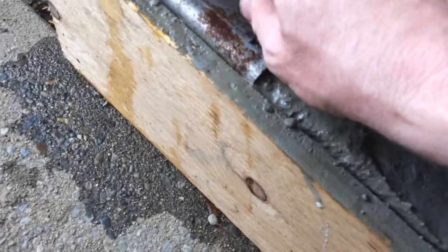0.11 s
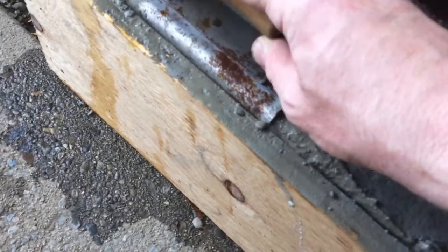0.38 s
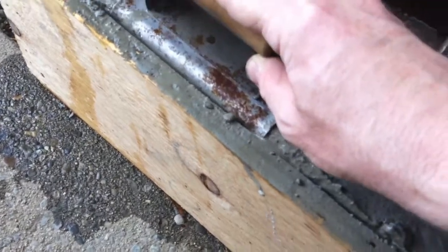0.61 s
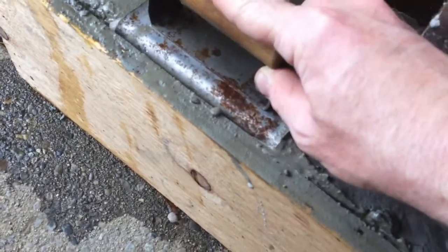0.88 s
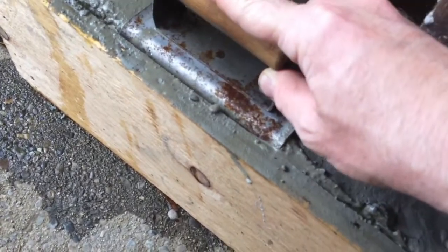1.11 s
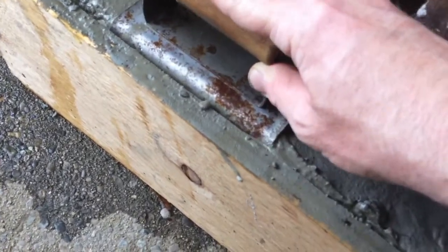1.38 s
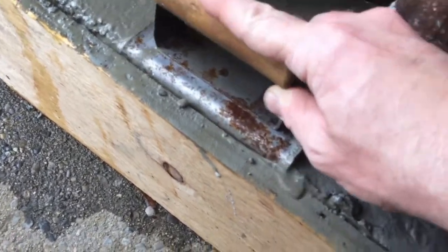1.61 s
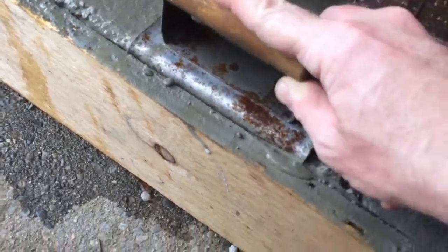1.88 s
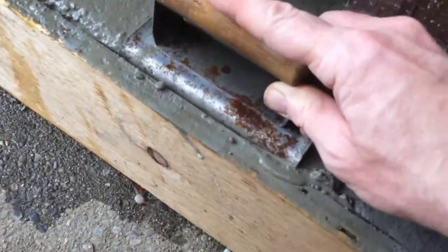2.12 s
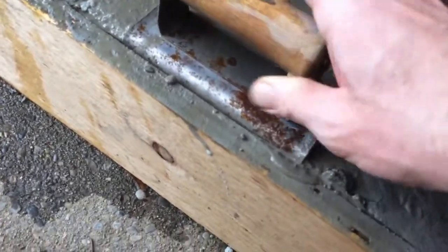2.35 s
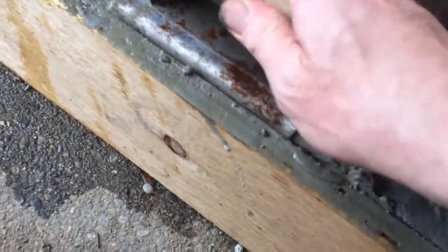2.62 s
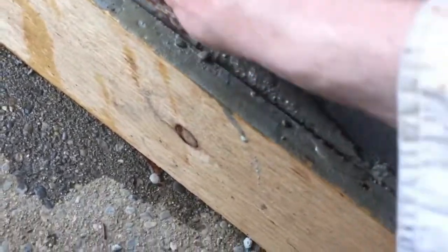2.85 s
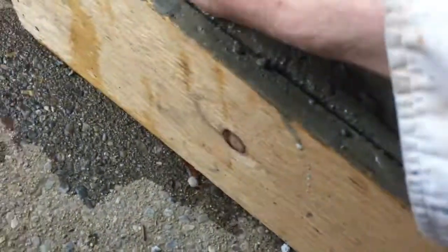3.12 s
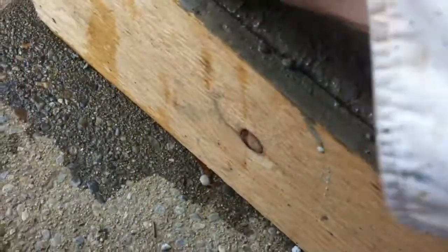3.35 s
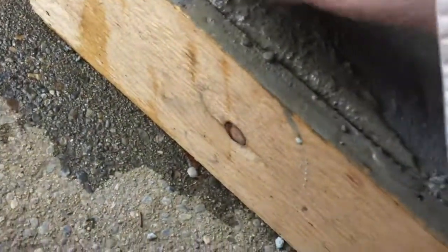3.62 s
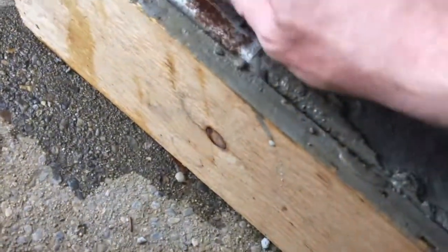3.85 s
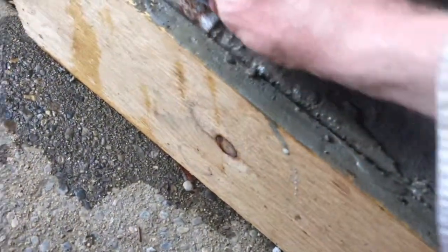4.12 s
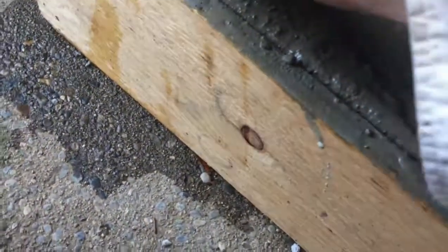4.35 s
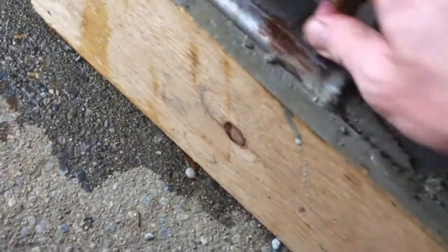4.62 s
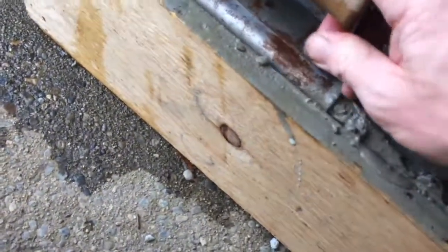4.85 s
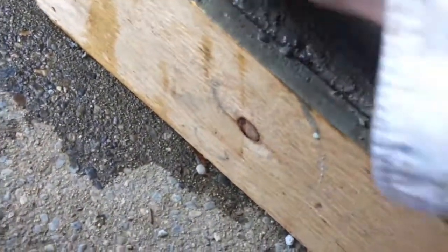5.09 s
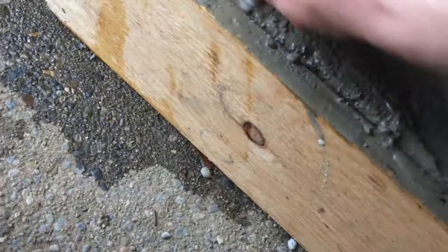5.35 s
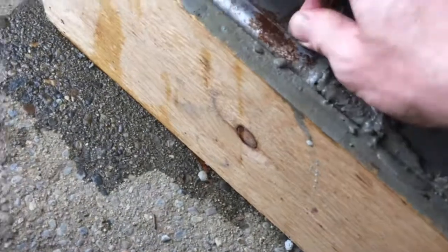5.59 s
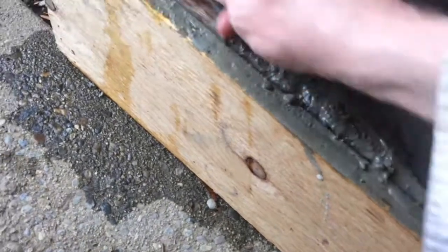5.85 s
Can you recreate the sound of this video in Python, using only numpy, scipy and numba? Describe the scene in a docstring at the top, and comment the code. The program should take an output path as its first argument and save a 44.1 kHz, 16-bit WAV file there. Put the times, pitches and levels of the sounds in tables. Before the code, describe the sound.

Close, sandy metallic scraping of a hand tool on wet concrete, crowded at first, sparser midway, then busy again with sharp stone ticks.

```python
"""Outdoors, a steel edging tool is worked back and forth along wet concrete beside a wooden form.
From the start far traffic rumbles as filtered noise, and pushes crowd together: sand grains slip in dense
clicks that drive the blade and form board as resonators, and stones catch with a snap and a short ring.
In the first second the blade sings most freely; from about two seconds it is mostly bedded and damped,
with a lull of small slips. After four seconds the pushes crowd again, with some of the hardest catches."""
import sys
import numpy as np
from scipy import signal
from scipy.fft import rfft, irfft
from scipy.io import wavfile
from numba import njit

SR = 44100
rng = np.random.default_rng(int(sys.argv[2]) if len(sys.argv) > 2 else 0)


def to_wav(sig):
    """Store sig (one row per channel, or 1-D mono) as 16-bit WAV at the path in sys.argv[1].

    Samples outside -1..1 are clipped; the rate is SR.
    """
    pcm = np.clip(np.atleast_2d(sig), -1, 1) * 32767
    pcm = np.round(pcm).astype(np.int16)
    wavfile.write(sys.argv[1], SR, pcm.T)  # frames by channels


def volts(x):
    """Linear amplitude factor 10**(x/20) for a level x in dB, scalar or array-like."""
    e = np.asarray(x, float) / 20
    return 10 ** e


N = 263277


def rms_one(x):
    """Normalization: scale to unit rms, so that levels compare by power."""
    return x / np.sqrt(np.mean(x ** 2) + 1e-20)


def in_time(rows):
    """Linear interpolation: the columns of a time table, one value per sample."""
    s, *columns = np.transpose(rows)
    return [np.interp(np.arange(N) / SR, s, c) for c in columns]


def coloured(x, spectrum):
    """Minimum-phase filtering: causal, so nothing sounds early; follows a (frequency, level) table."""
    hz, db = np.transpose(spectrum)
    grid = np.maximum(np.arange(2049) * SR / 4096, 1)
    log_gain = np.log(volts(np.interp(np.log(grid), np.log(hz), db)))
    cepstrum = irfft(log_gain)
    # folding the cepstrum onto positive time gives minimum phase
    cepstrum[1:2048] *= 2
    cepstrum[2049:] = 0
    impulse_response = irfft(np.exp(rfft(cepstrum)))
    return rms_one(signal.fftconvolve(x, impulse_response)[:N])


def drift(rate_hz):
    """Low-pass random process: slow chance with unit rms, made at SR / 20 and interpolated."""
    r = np.exp(-40 * np.pi * rate_hz / SR)
    noise = rng.standard_normal(N // 20 + 4002)
    slow = signal.lfilter([1], [1, -2 * r, r * r], noise)[4000:]   # start-up dropped
    return np.interp(np.arange(N) / 20, np.arange(len(slow)), rms_one(slow))


@njit
def resonate(x, hz, width, sr):
    """Two-pole resonance with movable centre and width; its noise power hardly depends on the width."""
    y = np.zeros(len(x))
    for i in range(2, len(x)):
        r = np.exp(-np.pi * width[i] / sr)
        drive = np.sqrt(1 - r * r) * (x[i] - x[i - 2])
        y[i] = drive + 2 * r * np.cos(2 * np.pi * hz[i] / sr) * y[i - 1] - r * r * y[i - 2]
    return y


def modes(x, table, wander_db):
    """Modal superposition: parallel resonances, each driven harder or softer from moment to moment."""
    out, ones = 0, np.ones(N)
    for k, (hz, width_hz, db) in enumerate(table):
        drive = x * volts(db + wander_db * np.tanh(drift(rate_hz=8.1)))
        ringing = resonate(drive, hz * ones, max(width_hz, 5) * ones, SR)   # at least 5 Hz wide
        out = out + (-1) ** k * ringing
    return rms_one(out)


# relative spectrum of the road: (frequency [Hz], spectral density [dB])
ROAD_SPECTRUM = [(15, -66), (25, -5), (130, 0.5), (180, -1.5), (236, -8), (439, -18.5), (840, -24.5),
                 (936, -18), (1020, -25.5), (1440, -20.5), (2050, -28), (2280, -22), (3620, -39),
                 (7110, -68), (16000, -50)]
# engine notes in the rumble: (frequency [Hz], width, raised to 5 if less [Hz], drive level [dB])
ENGINE_NOTES = [(65, 4.8, -12), (138, 4.1, -5), (241.7, 5.7, -10.5)]
TRAFFIC_DB = -40.5   # of the road before its slow wander


def traffic():
    """Noise filtering and resonance: distant road rumble, blurred engine notes and a soft outdoor hiss."""
    road = coloured(rng.standard_normal(N), ROAD_SPECTRUM)
    drone = volts(-8.0) * modes(rng.standard_normal(N), ENGINE_NOTES, wander_db=3.0)
    drone = signal.sosfilt(signal.butter(2, [45, 300], "band", fs=SR, output="sos"), drone)
    return volts(TRAFFIC_DB + 2.0 * drift(rate_hz=3.7)) * (road + drone)


# pushes of the hand: (bite time [s], turn time [s], lift time [s],
#                      level at bite [dB], level at turn [dB], level at lift [dB])
HAND_PUSHES = [(0.0, 0.003, 0.14, -19, -25.5, -34.5), (.135, .216, .25, -33.5, -25.5, -30.5),
               (.262, 0.327, .35, -31, -28, -36), (0.366, 0.37, .4, -29, -27.5, -30),
               (0.407, 0.423, 0.47, -35, -28.5, -34.5), (0.467, .528, 0.59, -30, -26.5, -35),
               (0.614, 0.638, 0.7, -36, -31, -37), (0.798, 0.889, 0.953, -27.5, -27, -41.5),
               (1.03, 1.079, 1.093, -49.5, -34.5, -29), (1.43, 1.47, 1.57, -63, -44, -40),
               (1.507, 1.587, 1.629, -27, -20.5, -39), (1.732, 1.745, 1.754, -31, -33, -34),
               (1.769, 1.827, 1.856, -30.5, -25.5, -42.5), (1.942, 1.978, 2.014, -41, -34.5, -52),
               (2.17, 2.209, 2.256, -58, -39, -38.5), (2.601, 2.663, 2.67, -39, -29.5, -29.5),
               (2.688, 2.775, 2.928, -29.5, -24, -39), (2.92, 2.992, 3.09, -31, -32, -33.5),
               (3.204, 3.28, 3.338, -36, -26.5, -22.5), (3.49, 3.597, 3.684, -50.5, -35, -28),
               (3.646, 3.66, 3.738, -24, -32, -33.5), (3.754, 3.92, 3.935, -35, -30.5, -36),
               (4.034, 4.146, 4.21, -58.5, -34.5, -26.5), (4.23, 4.248, 4.27, -25.5, -25, -34),
               (4.268, 4.289, 4.32, -28.5, -21, -36.5), (4.437, 4.49, 4.512, -46.5, -36, -30),
               (4.52, 4.534, 4.53, -25, -26.5, -24), (4.54, 4.652, 4.773, -30.5, -19.5, -32),
               (4.819, 4.854, 5.06, -58, -41.5, -25), (4.912, 5.005, 5.1, -27.5, -24, -26.5),
               (5.101, 5.13, 5.185, -30, -30, -26), (5.23, 5.41, 5.44, -48, -29, -22.5),
               (5.439, 5.519, 5.593, -21.5, -21.5, -39), (5.616, 5.68, 5.715, -37.5, -34, -40),
               (5.728, 5.813, 6.12, -34, -30.5, -31.5)]
# small slips of the resting tool: (time [s], held time [s], level [dB])
SMALL_SLIPS = [(.708, 0.046, -49.5), (0.774, 0.006, -30.5), (1.222, .03, -58), (1.346, .002, -52),
               (1.405, 0.039, -60.5), (1.66, 0.014, -52), (1.885, .004, -56), (1.9, 0.016, -43),
               (2.064, 0.0083, -43), (2.088, 0.022, -40.5), (2.35, .003, -61), (2.39, .012, -54.5),
               (2.44, .002, -58), (2.488, 0.0087, -53.5), (2.545, .04, -50.5), (3.15, 0.036, -44),
               (3.375, 0.021, -51), (3.402, 0.013, -42), (3.42, .035, -50), (3.98, .003, -54),
               (4.322, 0.013, -37.5), (4.36, 0.073, -53), (4.41, 0.023, -40.5)]
BITE_DB_PER_S, LIFT_DB_PER_S = 1800, 1194   # how fast a push sets in and lets go
SLIP_DB_PER_S, SETTLE_DB_PER_S, REST_DB = 2000, 1500, -65


def pressure_db():
    """Masking by the maximum: the strongest push or slip sets the scrape level, over a faint rest."""
    t, level = np.arange(N) / SR, np.full(N, float(REST_DB))
    for bite, turn, lift, *dbs in HAND_PUSHES:
        edges = BITE_DB_PER_S * np.maximum(bite - t, 0) + LIFT_DB_PER_S * np.maximum(t - lift, 0)
        level = np.maximum(level, np.interp(t, [bite, turn, lift], dbs) - edges)
    for s, held, db in SMALL_SLIPS:
        edges = SLIP_DB_PER_S * np.maximum(s - t, 0) + SETTLE_DB_PER_S * np.maximum(t - s - held, 0)
        level = np.maximum(level, db - edges)
    return level


GRAINS_PER_S = 5000


def slips(spread_db, judder_db, count):
    """Stick-slip excitation: uneven grain clicks over wet hiss, bunched by judder; random signs per body."""
    sizes = volts(spread_db * np.minimum(rng.exponential(1, N), 5))
    clicks = sizes * (rng.random(N) < GRAINS_PER_S / SR)
    judder = volts(judder_db * (drift(rate_hz=54) + 0.81 * drift(rate_hz=180)))
    hiss_power = volts(-4.5)
    rough = rms_one(np.sqrt(rms_one(clicks) ** 2 + hiss_power) * judder)
    # each body feels the slips in its own direction
    return rough * rng.choice([-1, 1], (count, N))


def patchy(carriers, patch_db):
    """Band-wise modulation: about third-octave bands swell and fade as sand of other sizes passes."""
    edges = np.geomspace(1300, 12000, 11)
    out = 0
    for k, edge in enumerate(zip(edges, edges[1:])):
        band = signal.sosfilt(signal.butter(2, edge, "band", fs=SR, output="sos"), carriers[k % 2])
        out = out + band * volts(patch_db * np.tanh(drift(rate_hz=4.7)))
    return out


def pebbles(per_s, cycles):
    """Impulse response: coarser grains roll by at random, each ringing briefly at one of 16 pitches."""
    sizes = volts(4.0 * np.minimum(rng.exponential(1, N), 3)) * (rng.random(N) < per_s / SR)
    pitches, dealt, ones = np.geomspace(1000, 10000, 16), rng.integers(0, 16, N), np.ones(N)
    out = 0
    for k, hz in enumerate(pitches):
        out = out + resonate(sizes * (dealt == k), hz * ones, hz / cycles * ones, SR)
    return rms_one(out)


# fixed modes of the steel: (frequency [Hz], width [Hz], drive level [dB])
STEEL_MODES = [(5400, 350, -4), (7200, 250, -4), (8300, 200, -8), (11000, 400, -11)]
# relative spectrum of the sand: (frequency [Hz], spectral density [dB])
SAND_SPECTRUM = [(1300, -38), (2000, -20.5), (2500, -2), (3500, -1), (5500, 3), (7000, 3.5), (8500, 1),
                 (11000, -23)]


def sand_and_steel(sand_force, steel_force, free):
    """Energy sharing: the freer the blade, the more its fixed modes stand out of the sand."""
    steel = modes(steel_force, STEEL_MODES, wander_db=9.0)
    sand = coloured(patchy(sand_force, patch_db=4.5), SAND_SPECTRUM)
    return np.sqrt(1 - 0.92 * free ** 2) * sand + volts(-9.5) * free * steel


# two upper blade modes shift with grip and angle: (time [s], second mode frequency [Hz],
#   second mode level [dB], third mode frequency [Hz], third mode level [dB])
UPPER_MODES = [(0, 3200, -13, 5270, -11), (.2, 2830, -8.5, 4640, -8), (.63, 3320, -6.5, 4350, -7),
               (.93, 3340, -4.5, 4430, -8.5), (1.55, 3180, -9.5, 4650, -9), (1.78, 2860, -5.5, 4370, -4.5),
               (2.2, 3130, -7.5, 4700, -8), (2.7, 3100, -13, 4760, -8.5), (3.05, 3240, -6.5, 5000, -4.5),
               (3.4, 2850, -12, 4540, -11.5), (3.8, 3000, -18, 5300, -11), (4.2, 2950, -11, 4500, -2.5),
               (4.5, 3370, -12.5, 4900, -16), (4.75, 3460, -6.5, 4700, -12.5), (5.08, 3270, -8, 4410, -3),
               (5.25, 3070, -15, 5260, -18), (5.52, 3040, -4, 5560, -6), (5.97, 3300, -8.5, 4900, -4)]


def upper_modes(second_force, third_force, width_hz):
    """Time-varying resonance: two upper blade modes move in pitch and level."""
    second_hz, second_db, third_hz, third_db = in_time(UPPER_MODES)
    second = rms_one(resonate(second_force, second_hz, .8 * width_hz, SR))
    third = rms_one(resonate(third_force, third_hz, 1.1 * width_hz, SR))
    return volts(second_db) * second + volts(third_db) * third


BEDDED_RING_DB, FREE_RING_DB = -16.5, 2   # before the push level and chance grip
GRIP_DB = 2.1   # chance unevenness of the grip


def lowest_mode(force, pitch_hz, width_hz, free):
    """Cascaded resonance: two passes give the lowest blade mode steep skirts; freedom raises its level."""
    song = resonate(force, pitch_hz, width_hz, SR)
    song = rms_one(resonate(song, pitch_hz, 1.1 * width_hz, SR))
    return volts(between(BEDDED_RING_DB, FREE_RING_DB, free) + GRIP_DB * drift(rate_hz=6.3)) * song


# relative spectrum of the bedded blade's damped scrape: (frequency [Hz], spectral density [dB])
SLURRY_SPECTRUM = [(500, -37), (800, 1.5), (1100, -1.5), (1700, 0.5), (2300, -5.5), (3500, -30.5)]
SLURRY_DB = -7   # fully bedded, before the push level and chance grip


def slurry(force, free):
    """Damping: a bedded blade scrapes broadly and fades from hearing as it comes free."""
    level = volts(SLURRY_DB + GRIP_DB * drift(rate_hz=3.0))
    return level * np.sqrt(1 - free) * coloured(force, SLURRY_SPECTRUM)


# modes of the form board: (frequency [Hz], width [Hz], drive level [dB])
BOARD_MODES = [(213, 123, -8), (383, 99, -0.5), (443.6, 116, 0.5), (580, 165, -1.5)]


def form_board(force, board_db):
    """Sympathetic vibration: the wooden form answers the slips lower down, through a low-pass."""
    board = volts(board_db) * modes(force, BOARD_MODES, wander_db=2.0)
    return signal.sosfilt(signal.butter(2, 900, fs=SR, output="sos"), board)


# relative spectrum of the finest sand: (frequency [Hz], spectral density [dB])
FINE_SAND_SPECTRUM = [(5000, -60), (7500, -31), (9000, 0.5), (11000, -1), (13000, -5), (14500, -11),
                      (16000, -9.5)]
BEDDED_SHEEN_DB, FREE_SHEEN_DB = -3.5, -9   # before the push level and chance grip


def fine_sand(force, free):
    """Filtered friction noise: the finest sand is louder under a bedded blade."""
    level_db = between(BEDDED_SHEEN_DB, FREE_SHEEN_DB, free) + GRIP_DB * drift(rate_hz=11.0)
    return volts(level_db) * coloured(force, FINE_SAND_SPECTRUM)


def between(bedded, singing, free):
    """Linear mixing of a bedded and a freely singing value by the blade's freedom."""
    return bedded + (singing - bedded) * free


# how the tool sits in the concrete: (time [s], lowest blade mode frequency [Hz],
#   freedom to sing [0-1], board level before its low-pass and the push level [dB])
TOOL_SEAT = [(0, 1540, 0.85, -15.5), (.16, 1360, 0.7, -11.5), (.22, 1570, .75, -9), (.35, 1620, 0.92, -10),
             (.6, 1753, 0.89, -10), (.9, 1890, 0.85, -8), (1.05, 2140, 0.57, -4), (1.45, 1940, 0.17, -6),
             (1.53, 1800, 0.83, -13.5), (1.6, 2490, 0.73, -7.5), (1.74, 1780, 0.36, -8.5),
             (1.85, 2400, 0.57, -1.5), (1.95, 1810, 0.4, -4.5), (2.1, 1180, 0.74, -4), (2.25, 1540, 0, -10),
             (2.65, 1240, 0.17, -6.5), (2.72, 1680, 0.4, -6.5), (2.79, 1800, .65, -8),
             (2.97, 1920, .05, -10), (3.05, 1790, 0.65, -4), (3.2, 1310, 0.33, -11), (3.34, 980, 0.59, -13),
             (3.68, 990, 0.37, -8), (3.8, 1580, 0.1, -6), (4.2, 1600, 0.26, -8), (4.29, 1830, 0.53, -4),
             (4.45, 1600, 0.23, -9.5), (4.7, 1490, 0.41, -3), (4.88, 1750, 0.23, -7),
             (5.0, 1494, 0.38, -7.5), (5.1, 1602, 0.26, -7.5), (5.17, 1800, 0.68, -8),
             (5.35, 1490, 0.25, -14), (5.46, 1540, 0.29, -7.5), (5.57, 1560, 0.84, -4.5),
             (5.65, 1780, 0.88, -13.5), (5.78, 1580, 0, -5.5), (5.97, 1730, 0.68, -6.5)]
BEDDED_WIDTH_HZ, FREE_WIDTH_HZ = 580, 320   # first pass of the lowest blade mode


def scraping():
    """Common excitation: one train of slips drives the sand, the steel, the blade and the board."""
    pitch_hz, free, board_db = in_time(TOOL_SEAT)
    free = np.clip(free, .02, .98)
    width_hz = between(BEDDED_WIDTH_HZ, FREE_WIDTH_HZ, free)
    force = slips(spread_db=3.0, judder_db=1.5, count=9)
    grit = sand_and_steel(force[[1, 8]], force[0], free)
    grit += upper_modes(force[6], force[7], width_hz)
    grit += volts(-8.0) * pebbles(per_s=250, cycles=20)
    blade = lowest_mode(force[2], pitch_hz, width_hz, free) + slurry(force[3], free)
    board = form_board(force[4], board_db)
    sheen = fine_sand(force[5], free)
    return volts(pressure_db()) * (grit + blade + board + sheen)


# stones catching the edge: (time [s], level before the parts are weighted [dB], ring frequency [Hz])
STONE_CATCHES = [(0.0149, -18, 1400), (0.1986, -14, 1440), (0.2164, -19, 7200), (0.2731, -9.5, 1860),
                 (0.3074, -10.5, 1700), (0.362, -14, 1640), (0.707, -19.5, 1750), (0.757, -21, 1680),
                 (0.7692, -15.5, 3620), (0.7741, -10.5, 1680), (0.7951, -19, 1680), (0.8041, -14, 1740),
                 (1.067, -22.5, 2360), (1.2203, -24.5, 5550), (1.236, -32, 5140), (1.2484, -37, 6740),
                 (1.345, -27.5, 5400), (1.4683, -27, 6900), (1.502, -16, 4960), (1.513, -24, 3560),
                 (1.5238, -10.5, 1840), (1.734, -29, 4940), (1.8933, -18.5, 7900), (1.902, -25, 7850),
                 (2.096, -27.5, 960), (2.254, -19, 4720), (2.3996, -45, 1770), (2.4884, -41, 1390),
                 (2.5635, -22, 6500), (2.6643, -12, 7800), (2.675, -11.5, 7200), (2.7766, -13, 1870),
                 (2.9231, -6.5, 9200), (3.1535, -26.5, 1020), (3.212, -25, 1300), (3.3323, -13, 950),
                 (3.343, -9, 4750), (3.401, -22, 5100), (3.5982, -17, 5040), (3.6474, -13, 4800),
                 (3.678, -13, 5700), (4.1545, -11.5, 4520), (4.2095, -23, 6380), (4.2233, -5, 5900),
                 (4.2777, -6.5, 4534), (4.4873, -16, 7600), (4.5165, -6, 6760), (4.9127, -7, 3980),
                 (5.1841, -16, 1559), (5.313, -23, 8100), (5.5333, -7, 3000), (5.619, -25, 1380),
                 (5.6324, -18.5, 1940), (5.687, -17, 5200), (5.7285, -20, 4060), (5.888, -14, 4200)]
CRUNCH_S, RING_CYCLES = 0.0015, 1.3   # decay time is the crunch time plus these cycles of the ring
RING_FADE_DB = 4.5   # per octave above 2 kHz: small stones click dry


def catches():
    """Impact and free decay: each stone gives a dry tick, a brief crunch and a ring of its own pitch."""
    out, t = np.zeros(N + 1024), np.arange(1024) / SR
    noise = rng.standard_normal((len(STONE_CATCHES), len(t)))
    for (s, db, hz), burst in zip(STONE_CATCHES, noise):
        fall = np.exp(-t / (CRUNCH_S + RING_CYCLES / hz))
        tick = np.exp(-t / 0.00036)
        snap = burst * (volts(-5.5) * fall + volts(-6.0) * tick)
        ring_db = 4.0 - RING_FADE_DB * np.log2(max(hz, 2000) / 2000)
        onset = 1 - np.exp(-t / 0.00087)
        ring = volts(ring_db) * np.sin(2 * np.pi * hz * t) * fall * onset
        at = round(s * SR)
        out[at:at + len(t)] += volts(db) * (snap + ring)
    return signal.sosfilt(signal.butter(1, [900, 9500], "band", fs=SR, output="sos"), out[:N])


def scene():
    """Superposition: traffic far off, the scraping tool and its catches close by."""
    return (traffic() + scraping() + catches())[None]


def roll_off(x):
    """The treble ends steeply here."""
    return signal.sosfilt(signal.butter(12, 16530, fs=SR, output="sos"), x)


def record(dry):
    """Band limiting: one microphone with a steep top and bottom."""
    x = signal.sosfilt(signal.cheby2(16, 50, 16100, fs=SR, output="sos"), dry)   # 50 dB down at 16.1 kHz
    x = signal.sosfilt(signal.butter(3, 38, "high", fs=SR, output="sos"), x)
    return roll_off(x)


dry = scene()
out = record(dry)
to_wav(out)
```